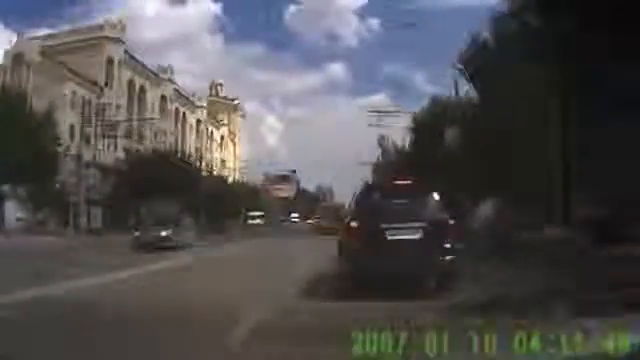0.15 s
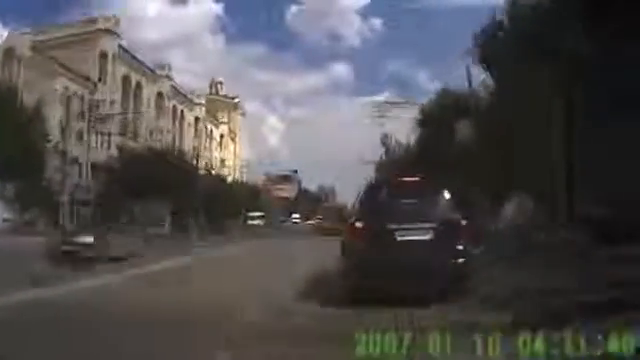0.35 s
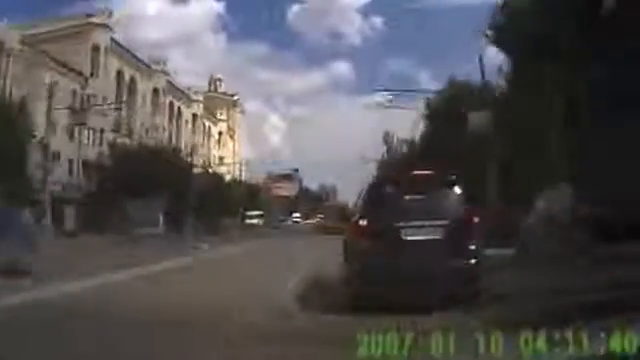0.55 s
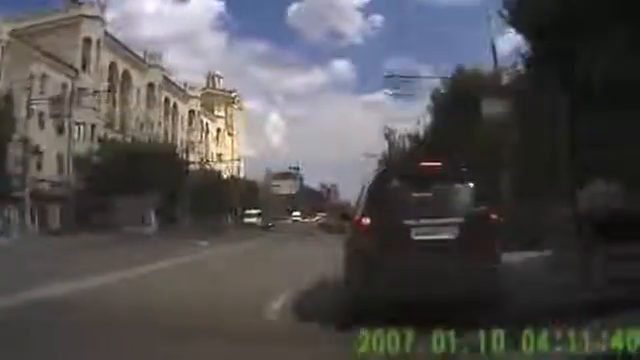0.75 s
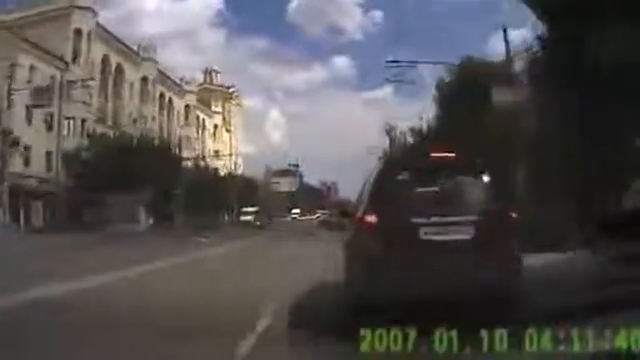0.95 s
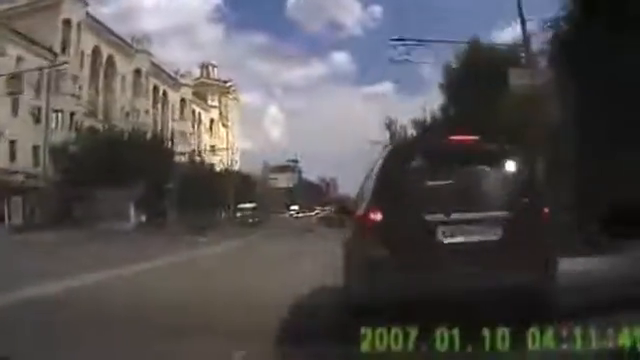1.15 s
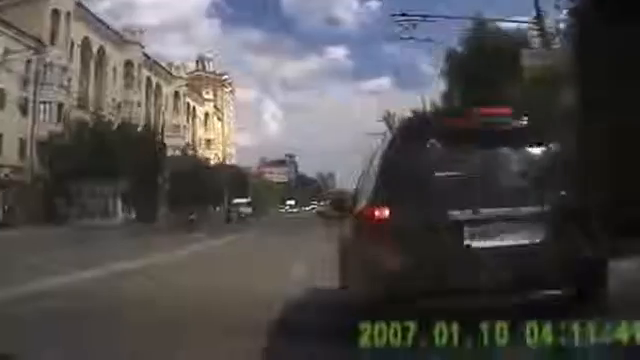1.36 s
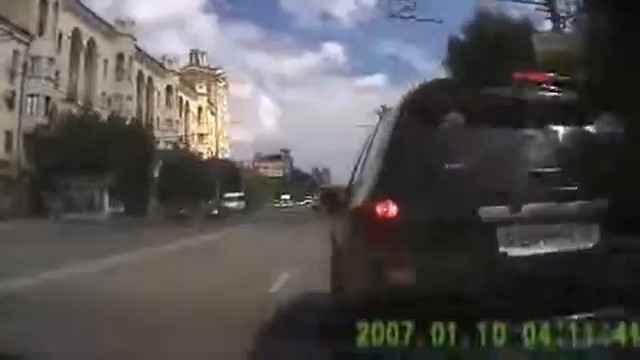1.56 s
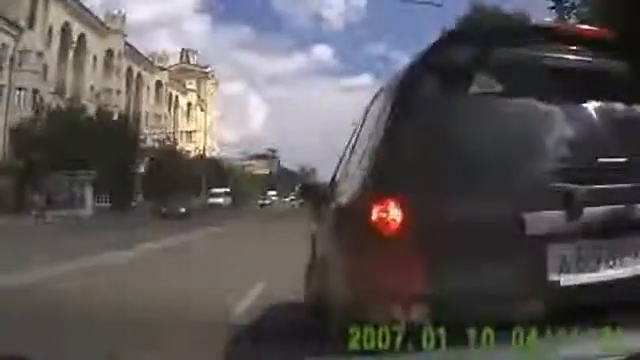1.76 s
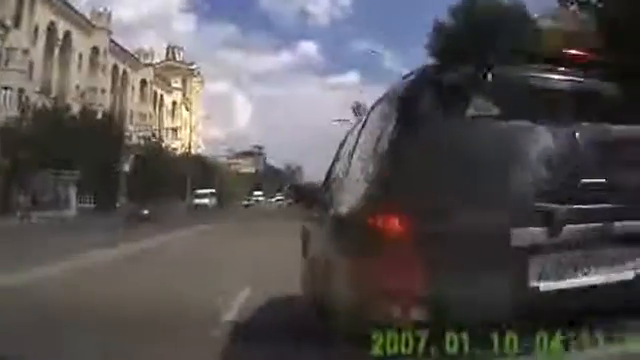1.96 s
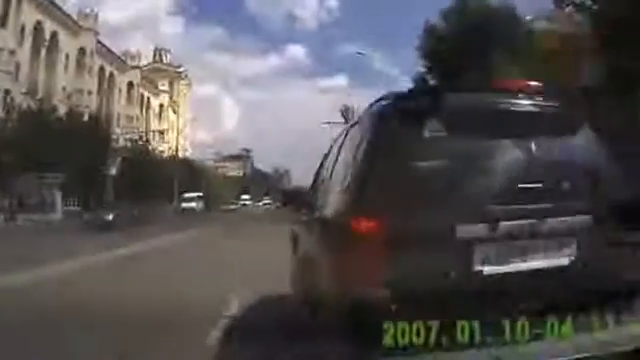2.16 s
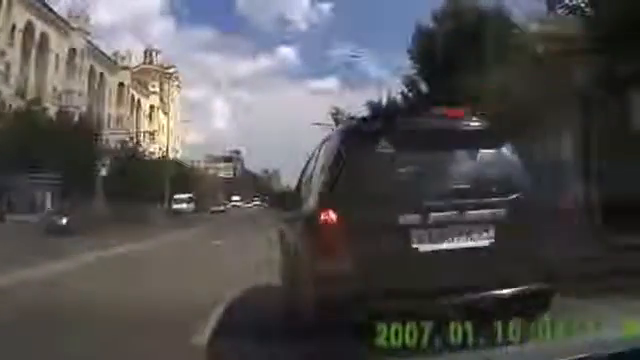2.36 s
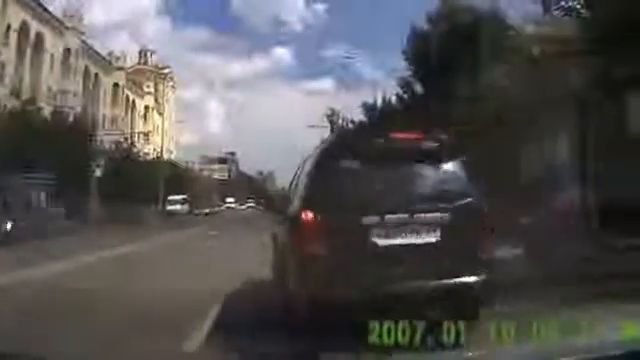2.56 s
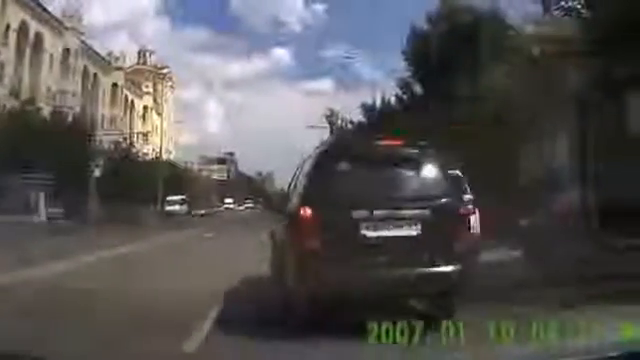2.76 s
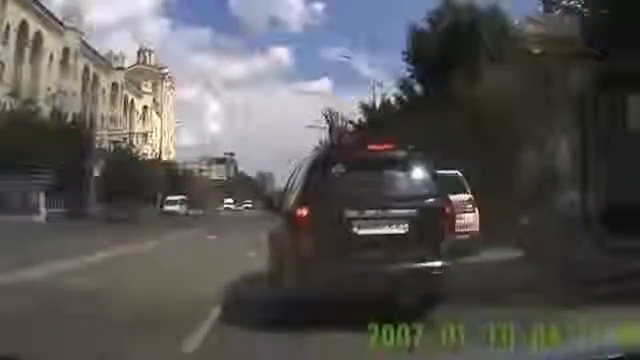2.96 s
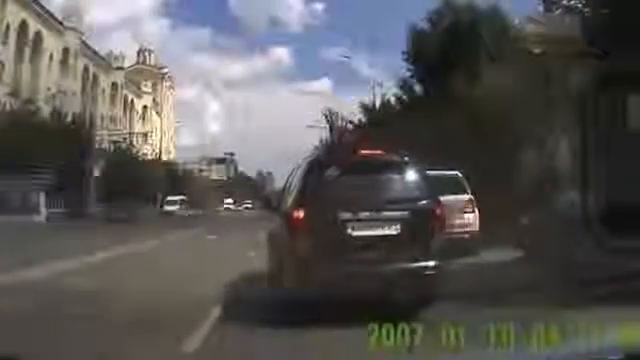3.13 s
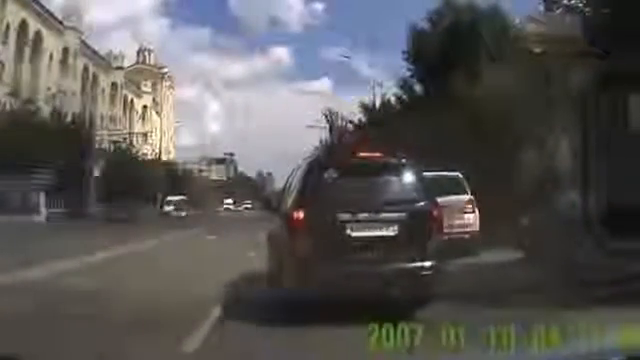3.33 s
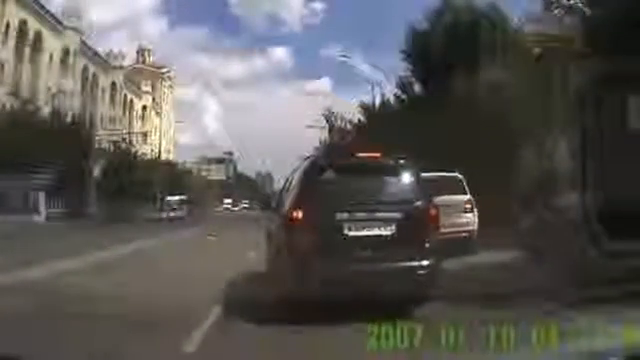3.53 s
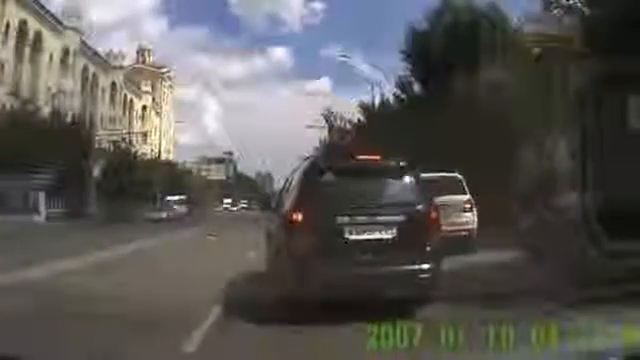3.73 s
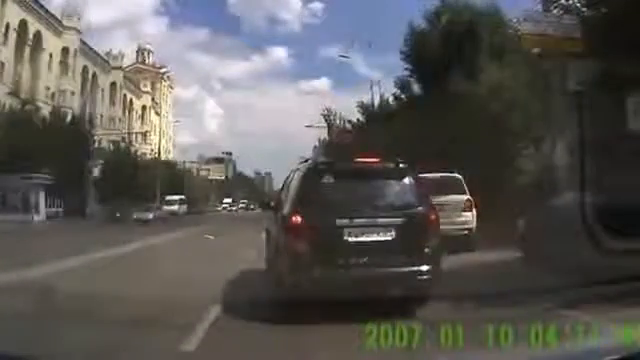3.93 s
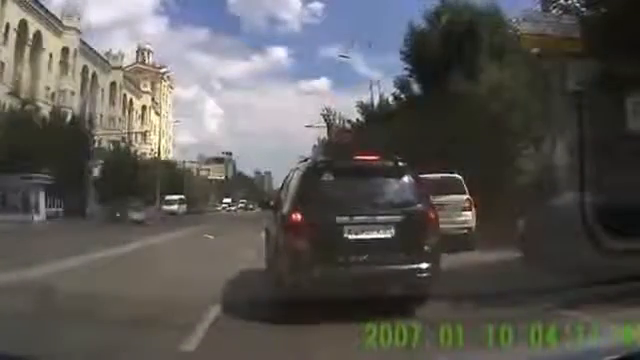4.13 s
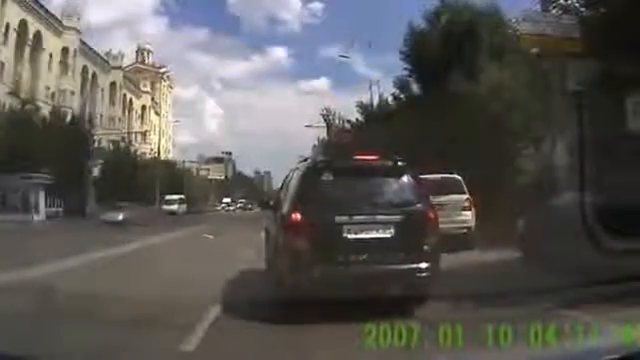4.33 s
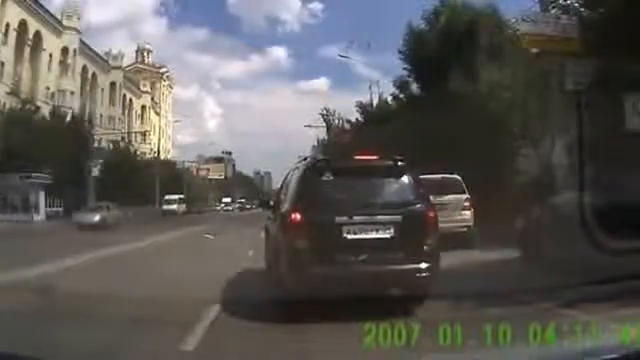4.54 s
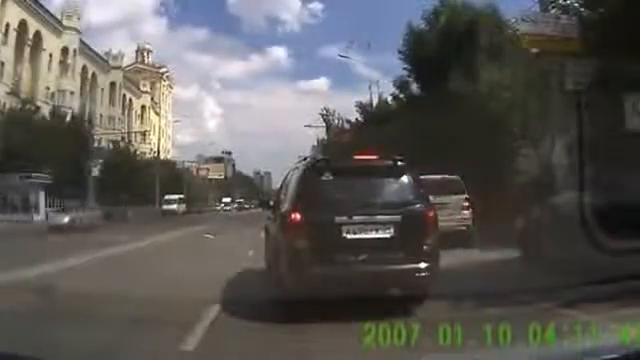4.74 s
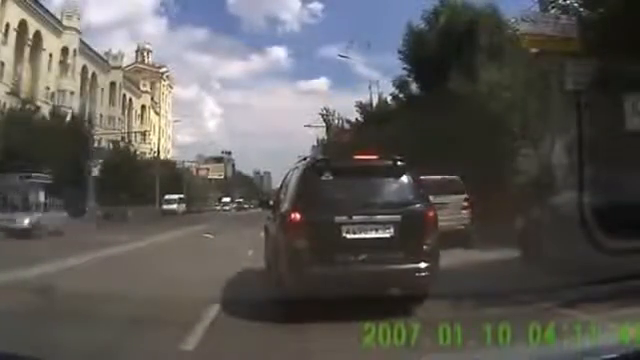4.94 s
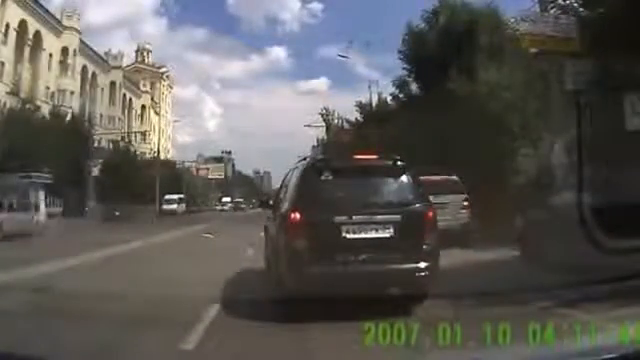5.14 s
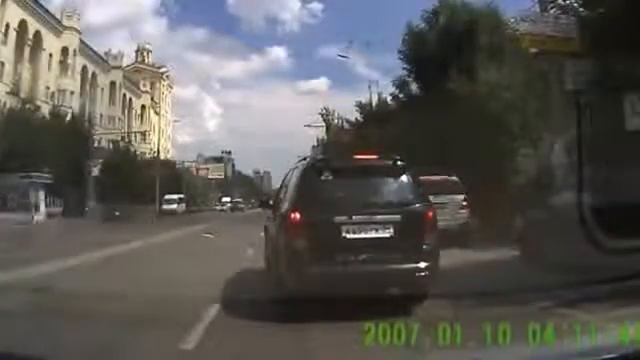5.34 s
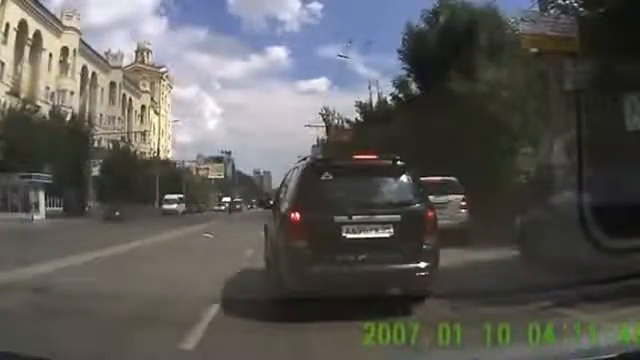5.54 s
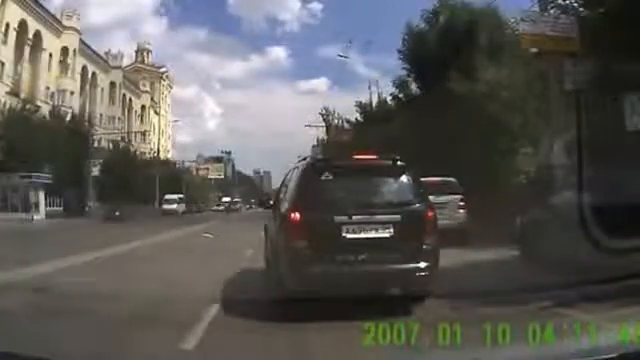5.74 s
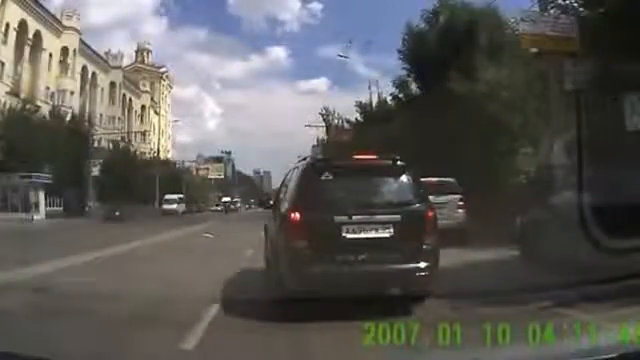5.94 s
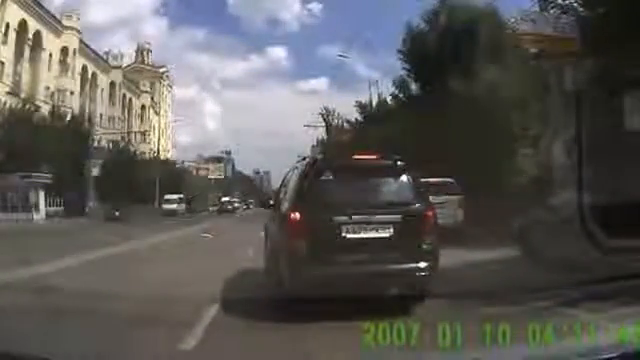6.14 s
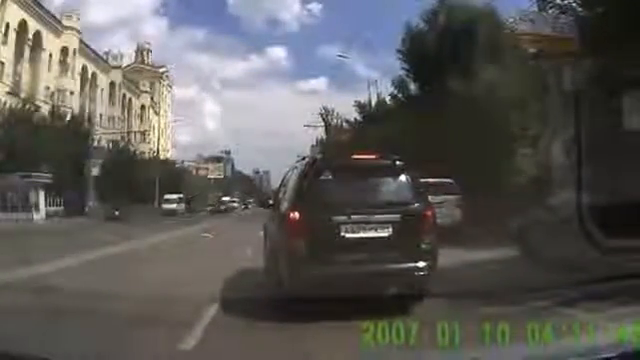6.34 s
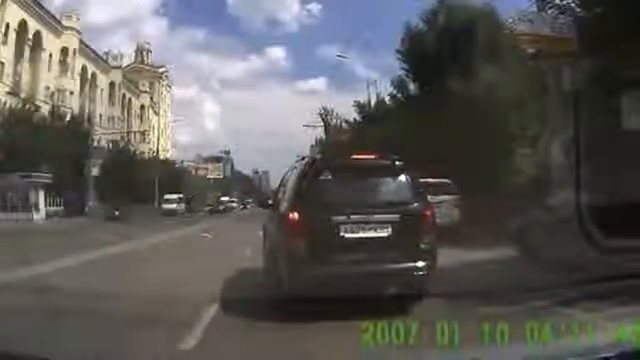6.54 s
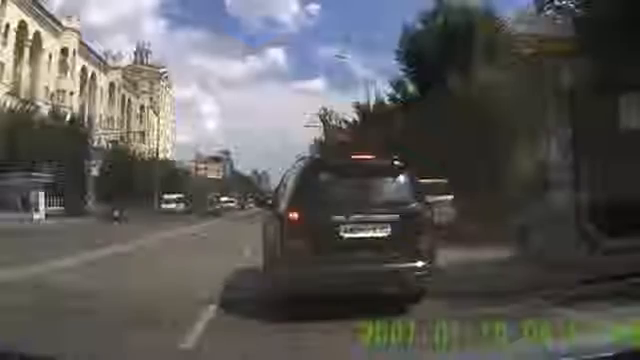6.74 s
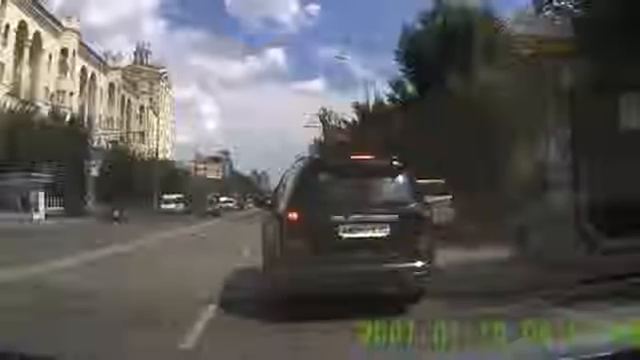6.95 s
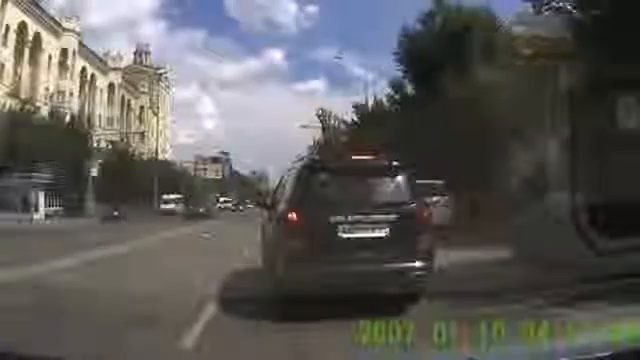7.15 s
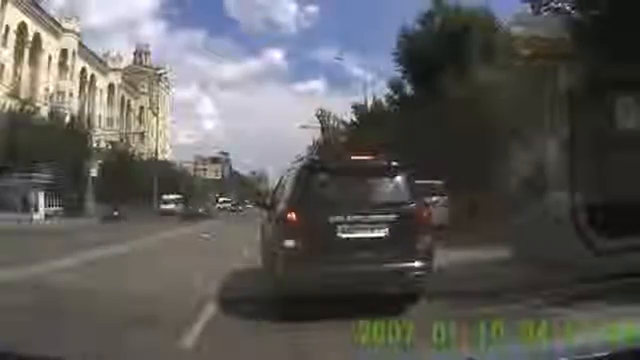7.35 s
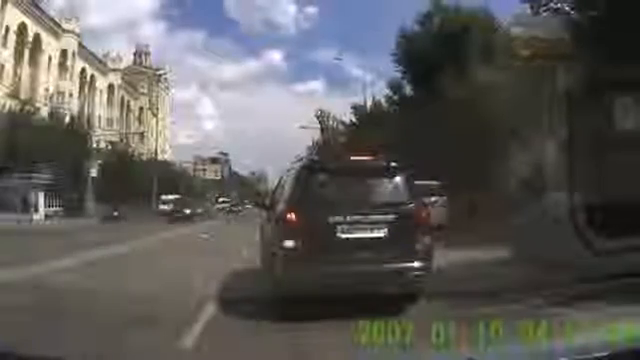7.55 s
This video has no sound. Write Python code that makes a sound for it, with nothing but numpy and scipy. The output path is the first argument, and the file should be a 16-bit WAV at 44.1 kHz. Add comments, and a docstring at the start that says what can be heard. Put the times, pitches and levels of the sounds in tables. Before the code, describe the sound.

A dull dashboard microphone in a small padded cabin picks up rumbling tyres and small plastic ticks in traffic. After a moment the wheels shudder and the tyres squeal; a boomy, crackling collision follows at once, with hard plastic snaps. Things clatter, squeak and slide for about a second. Then only a low hum and soft passing traffic remain, broken by occasional knocks, rustles, a loud click and a final small clatter.

```python
"""A bumper crunches into the car ahead, heard inside a car in city traffic: rushes of fractures ring the body.
Road rumble and passing tyres are filtered noise, the hum a sine; the trim ticks as the car rolls.
Hard braking brings a low judder of the wheels and a squeal of tyres, both wavering oscillators with noise.
Loose things tumble, squeak and rustle as grains of contact exciting resonances; catches snap as decaying modes.
The car then stands humming while a few more knocks and clicks sound near the microphone."""
import sys
import numpy as np
from scipy import signal
from scipy.fft import rfft, irfft, next_fast_len
from scipy.io import wavfile
from scipy.ndimage import uniform_filter1d

SR = 44100
rng = np.random.default_rng(int(sys.argv[2]) if len(sys.argv) > 2 else 0)


def output_pcm(signal):
    """Save a mono or channel-first signal as 16-bit PCM at the path in sys.argv[1].

    Samples are clipped to [-1, 1] before scaling.
    """
    pcm = np.clip(np.atleast_2d(signal).T, -1, 1) * 32767
    wavfile.write(sys.argv[1], SR, np.round(pcm).astype(np.int16))


N = 339129
TIME = np.arange(N) / SR   # s

# Spectrum of the cabin rumble: f/Hz, relative spectral level/dB
RUMBLE_SPECTRUM = [(12, -37.5), (20, -2.5), (60, -3.5), (198, -14), (274, -16), (392, -18), (458, -24.5),
                   (600, -22.5), (780, -63), (1320, -120)]
# Spectrum of the traffic outside: f/Hz, relative spectral level/dB
TRAFFIC_SPECTRUM = [(180, -33.5), (300, 0), (318, -12.5), (424, -7.5), (714, -3.5), (820, -8), (1010, 0),
                    (3100, -28.5), (3860, -25.5), (4750, -35), (6180, -77.5), (10400, -120)]
# Road rumble in the cabin, sinking to an idle as the car stops: t/s, level/dB
ROAD_LEVEL = [(0, -33), (0.9, -30.5), (1.55, -32.5), (2.8, -37), (3.3, -42.5), (4.5, -43.5), (7.66, -44)]
# Other cars passing: t/s when nearest, roar level/dB, hiss level/dB, time to come close/s
CAR_PASSES = [(1.12, -30.5, -43.5, 0.19), (3.66, -36.5, -39.5, 0.48), (6.25, -43, -44, 0.66)]
# Snaps of plastic: t/s, relative level/dB, ring f/Hz
SNAP_EVENTS = [(0.065, -22, 1940), (0.1962, -26.5, 1930), (0.3225, -27, 1700), (0.335, -24.5, 2560),
               (0.3815, -23, 2880), (0.5508, -23.5, 1730), (0.5877, -21, 1740), (0.8384, -23, 2080),
               (0.871, -30, 2700), (1.0664, -20.5, 1860), (1.4775, -35, 3030), (1.6604, -6, 2190),
               (1.7746, -5.5, 2070), (1.9962, -9, 1830), (2.0085, -11, 1850), (2.0181, -3, 1900),
               (2.0266, -5, 1600), (2.058, -7.5, 1480), (2.2099, -9.5, 2550), (2.613, -18.5, 2800),
               (5.2456, -24.5, 3420), (6.2986, 3, 2450), (6.34, -21, 1940), (7.0482, -21, 2060),
               (7.457, -9.5, 2590)]
# Modes of snapping plastic: f/Hz, relative level/dB, t60/s
PLASTIC_MODES = [(170, -2, 0.033), (700, -26, .02), (980, -18.5, 0.013), (1490, -31.5, .015),
                 (2020, -6, 0.0066), (2810, 1.5, 0.006), (3630, -2, .007), (4210, -12.5, 0.035)]
# Jolts that set the wheels hopping (brakes bite, wheels lock, impact, rocking back):
# t/s, hold/s, relative level/dB
WHEEL_JOLTS = [(1.587, 0.011, -21.5), (1.647, 0.18, -16), (1.939, .06, -12), (2.086, .01, -19),
               (2.198, 0.2, -33)]
# Knocks of loose things: t/s, relative level/dB, bass re middle/dB, treble re middle/dB,
# own ring f/Hz, number of rebounds (rounded)
KNOCK_EVENTS = [(1.597, -28.5, -8, -3.5, 1464, 2), (1.66, -20, -8, -6, 1470, 0),
                (1.68, -19.5, -5.5, 3.5, 1860, 1), (2.343, -12.5, -2.5, -5.5, 1410, 0),
                (2.368, -23.5, -3, 2.5, 1440, 1), (2.4, -16, -3, 2.5, 1010, 0),
                (2.409, -16, 0, -9, 1030, 0), (2.433, -25, 1, -3, 553, 0),
                (2.461, -21.5, -5.5, -1, 1026, 0), (2.472, -19, -5, -3.5, 1030, 0),
                (2.757, -16.5, -4.5, 0, 650, 0), (2.86, -32.5, 5, -11, 407, 2),
                (2.895, -19.5, -4.5, -8, 1024, 1), (2.959, -27.5, -3, -5, 1950, 1),
                (4.765, -13, 5, -7.5, 592, 0), (4.7718, -18.5, -3, -6, 563, 0),
                (5.06, -35.5, 9.5, -5, 760, 0), (5.276, -34.5, 1, -3, 530, 0),
                (7.262, -34, -3.5, -13, 1550, 0), (7.386, -34.5, -17, 0, 2510, 0),
                (7.423, -31, -18, -11, 1610, 0), (7.457, -25.5, -8, 2, 1056, 0),
                (7.4817, -16.5, -13, -9, 963, 1), (7.51, -16.5, -9, -12, 1012, 1),
                (7.526, -35.5, 8, -4, 523, 0), (7.55, -23.5, -11, -9, 1002, 0.16)]
# Resonances of the dashboard and its plastic fittings: f/Hz, width/Hz, relative level/dB
DASH_MODES = [(153, 69, -6.5), (387, 157, -3.5), (560, 127, -6), (756, 49, -8.5), (1036, 38, -3.5),
              (1382, 82, -1.5), (1970, 240, -6.5), (2300, 350, -4), (2970, 70, -10), (3200, 45, -7.5),
              (3930, 630, -9.5)]
# Tyres skid, are jolted free by the impact and catch again:
# t/s, hold/s, time until they grip again/s, relative level/dB
TYRE_SKIDS = [(1.665, .1, .29, -13), (1.939, 0.057, 0.59, -22.5), (2.827, 0.022, .52, -29.5)]
# Resonances of the car body: f/Hz, width/Hz, relative level/dB
BODY_MODES = [(90, 26, -1.5), (147.4, 30, 5), (266, 36, -1), (383, 49, 4), (663, 70, -4), (747, 61, -4),
              (906, 210, -10.5), (1120, 66, -10), (1517, 210, -10), (2144, 250, -20.5), (2510, 150, -23),
              (3060, 85, -23), (3730, 790, -28)]
# Plastic rubbing on plastic: t/s, length/s, f/Hz, width/Hz, level/dB
SQUEAK_EVENTS = [(1.983, .022, 1704, 80, -22), (2.243, 0.026, 1864, 60, -29),
                 (2.566, .05, 2860, 198, -41.5), (7.481, 0.056, 3970, 352, -27.5),
                 (7.545, 0.023, 3820, 203, -32)]
# Things sliding and rustling: t/s, length/s, level/dB
RUSTLE_EVENTS = [(2.309, 0.16, -31), (2.598, .10, -35.5), (2.795, 0.3, -39.5), (4.075, 0.018, -40.5),
                 (4.131, .035, -36.5), (4.196, 0.043, -39.5), (4.935, 0.099, -39), (5.241, 0.12, -49),
                 (6.316, 0.1, -42), (7.066, 0.019, -41.5)]

HUM_HZ, HUM_DB = 293.6, -47   # the level is that of the sine's peak
HISS_LAG_S = 0.11   # tyres throw their hiss backwards, so it peaks after the roar
FAR_ROAR_DB, FAR_HISS_DB = -56.5, -52   # distant traffic
OWN_ROAR_DB, OWN_HISS_DB = -12.5, -14   # the car's own tyres, relative to its rumble
JUDDER_HZ = 44.95   # mean rate at which the wheels hop
JOLT_ATTACK_S, JOLT_FALL_DB_PER_S = 0.018, 159.5
KNOCK_T60_S, KNOCK_BASS_T60_S, KNOCK_RING_T60_S = 0.058, 0.08642, 0.07598
REBOUND_S, REBOUND_SHRINK, REBOUND_LOSS_DB = 0.0145, 0.88, 3   # each bounce is shorter and weaker
SKID_ATTACK_S, SKID_FALL_DB_PER_S, GRIP_S = 0.0708, 45, 0.082
SQUEAL_HZ, SQUEAL_SAG_HZ, SAG_LAG_S = 1667, 111.5, 0.0352   # a hard slide drags the pitch down
CRASH_S = 1.885
# Parts of the crash: level/dB, attack/s, hold/s, fall/(dB/s)
BOOM, CRUNCH, SPLINTERS = (-9, 0.04, 0.0178, 114.5), (-7, 0.0219, 0.0236, 158.5), (-15, 0.0416, 0.0528, 151)
SETTLE_DB, SETTLE_FALL_DB_PER_S = -24, 36   # the bent panels creak on, relative to the crash
CABIN_T60_S, CABIN_DB = 0.055, -23.63
MIC_EDGE_HZ, BANDWIDTH_HZ, CUTOFF_HZ = 3410, 4904, 15000


def from_db(db):
    """Logarithmic level: 20 dB is a factor of ten in amplitude."""
    return 10 ** (np.asarray(db) / 20)


def rms_one(x):
    """Normalisation of mean power to 1."""
    return x / np.sqrt(np.mean(x ** 2) + 1e-20)


def steady(x, size):
    """Level equalisation by the running rms over `size` samples."""
    return x / np.sqrt(np.abs(uniform_filter1d(x ** 2, size=size)) + 1e-12)


def cut(x, hz, kind, order=3):
    """Butterworth filtering: maximally flat passband."""
    return signal.sosfilt(signal.butter(order, hz, kind, fs=SR, output="sos"), x + 1e-18)


def drift(rate_hz):
    """Low-passed chance: noise through a double pole, scaled to rms 1."""
    step = 40   # samples between control points
    pole = np.exp(-2 * np.pi * rate_hz * step / SR)
    noise = rng.standard_normal(N // step + 2002)
    slow = signal.lfilter([1], [1, -2 * pole, pole * pole], noise)[2000:]   # drop the filter's start
    return np.interp(np.arange(N) / step, np.arange(len(slow)), rms_one(slow))


def coloured_noise(spectrum):
    """Spectral shaping of white noise, interpolated over log frequency."""
    hz, db = np.transpose(spectrum)
    size = next_fast_len(N)
    bins = np.maximum(np.fft.rfftfreq(size, 1 / SR), 1)
    gain = from_db(np.interp(np.log(bins), np.log(hz), db))
    return rms_one(irfft(rfft(rng.standard_normal(size)) * gain, size)[:N])


def resonate(x, modes):
    """Modal superposition: parallel two-pole resonances with alternating signs."""
    out = 0
    for k, (hz, width, db) in enumerate(modes):
        r = np.exp(-np.pi * width / SR)
        poles = [1, -2 * r * np.cos(2 * np.pi * hz / SR), r * r]
        ring = (1 - r * r) / 2 * signal.lfilter([1, 0, -1], poles, x + 1e-18)
        out = out + (-1) ** k * from_db(db) * ring
    return out


def grains(size, per_s, spread_db):
    """Random impulse process: tiny contacts of uneven strength and either sign."""
    strength = from_db(spread_db * np.minimum(rng.exponential(1, size), 4))
    sign = rng.choice([-1, 1], size)
    return strength * sign * (rng.random(size) < per_s / SR)


def swell(s, attack_s, hold_s, fall_db_per_s):
    """Envelope of linear rise, hold and exponential decay."""
    t = TIME - s
    rise = np.clip(t / attack_s, 0, 1)
    return rise * from_db(-fall_db_per_s * np.maximum(t - attack_s - hold_s, 0))


def add(out, s, sound):
    """Superposition of a sound beginning at time s."""
    start = int(round(s * SR))
    out[start:start + len(sound)] += sound[:N - start]


def road_level():
    """Linear interpolation of the road level (dB) over time."""
    s, db = np.transpose(ROAD_LEVEL)
    return np.interp(TIME, s, db)


def tyre_levels(rumble_db, steepness=2.15):
    """Power addition of distant, own and passing tyres, each pass fading with distance (dB)."""
    roar = from_db(FAR_ROAR_DB) ** 2 + from_db(rumble_db + OWN_ROAR_DB) ** 2
    hiss = from_db(FAR_HISS_DB) ** 2 + from_db(rumble_db + OWN_HISS_DB) ** 2
    for s, roar_db, hiss_db, close_s in CAR_PASSES:
        t = TIME - s
        roar = roar + from_db(roar_db) ** 2 / (1 + (t / close_s) ** 2) ** steepness
        hiss = hiss + from_db(hiss_db) ** 2 / (1 + ((t - HISS_LAG_S) / close_s) ** 2) ** steepness
    return 10 * np.log10(roar), 10 * np.log10(hiss)


def street(flicker_db=1.5, tread_hz=1020, tread_width_hz=260, near_db=-31.0):
    """Broadband rolling noise: rumble through the body, tyres through the glass; a hum is added."""
    rumble_db = road_level()
    roar_db, hiss_db = tyre_levels(rumble_db)
    road = from_db(rumble_db) * steady(coloured_noise(RUMBLE_SPECTRUM), size=9000)

    wash = rms_one(cut(coloured_noise(TRAFFIC_SPECTRUM), 1700, "low", order=4))
    tread_noise = cut(rng.standard_normal(N), [500, 1600], "band")
    tread = rms_one(resonate(tread_noise, [(tread_hz, tread_width_hz, 0)]))
    near = from_db(roar_db - near_db)   # the closer a car passes, the more its tread grooves sing
    roar = (wash + near * tread) / np.sqrt(1 + near ** 2)
    roar = from_db(roar_db + flicker_db * drift(7.6)) * roar

    hiss = rms_one(cut(coloured_noise(TRAFFIC_SPECTRUM), 1494, "high", order=4))
    hiss = from_db(hiss_db + flicker_db * drift(15)) * hiss

    hum_phase = 2 * np.pi * np.cumsum(HUM_HZ + 0.7 * drift(2.96)) / SR
    hum = from_db(HUM_DB + 0.63 * drift(3)) * np.sin(hum_phase)
    return road + roar + hiss + hum


def trim_rattle(per_s=70, below_road_db=-18.5, fall_db_per_s=60):
    """Impulsive excitation: the road shakes ticks out of the trim; they die away after the crash."""
    modes = [(1700, 310, 10.0), (2900, 1800, 0.0), (4220, 250, 5.0)]
    ticks = rms_one(resonate(grains(N, per_s, 2.6), modes))
    rolling = from_db(-fall_db_per_s * np.maximum(TIME - CRASH_S, 0))
    return rolling * from_db(road_level() + below_road_db) * ticks


def snaps(ring_db=4, ring_t60=0.0083, rebound_s=0.000968, rebound=0.75, rebound_growth=0.26,
          stiff_hz=900, tail_db=-23, tail_t60=0.04, gain_db=1.0, size=3000):
    """Free modal decay: a catch lets go and rebounds; plastic rings, then the fittings around it."""
    out, t = np.zeros(N), np.arange(size) / SR
    for s, peak_db, hz in SNAP_EVENTS:
        snap = np.zeros(size)
        for f, db, t60 in list(PLASTIC_MODES) + [(hz, ring_db, ring_t60)]:
            uneven_db = rng.normal(0, 0.84)
            snap += from_db(db + uneven_db - 60 * t / t60) * np.sin(2 * np.pi * f * t)
        flight_s = rebound_s * from_db(rebound_growth * peak_db)   # a harder snap flies longer
        landing = rebound * np.interp(t - flight_s, t, snap, left=0)
        snap = cut(snap + landing, stiff_hz, "high", order=1)
        tail = rms_one(cut(rng.standard_normal(size), [900, 4200], "band", order=2))
        tail = tail * from_db(tail_db - 60 * t / tail_t60)
        add(out, s + 0.0008, from_db(peak_db + gain_db) * (snap / np.abs(snap).max() + tail))
    return out


def judder(wobble=0.05, shake_db=-7, gain_db=-1):
    """Sprung-mass oscillation: the braked wheels hop on their springs and shake the body."""
    jolts = [from_db(db) * swell(s, JOLT_ATTACK_S, hold, JOLT_FALL_DB_PER_S) for s, hold, db in WHEEL_JOLTS]
    level = np.max(jolts, axis=0)
    phase = 2 * np.pi * np.cumsum(JUDDER_HZ * (1 + wobble * drift(2.9))) / SR
    hop = np.sqrt(2) * np.sin(phase)
    shake = steady(cut(rng.standard_normal(N), [30, 120], "band", order=2), size=3000)
    return level * from_db(gain_db) * (hop + from_db(shake_db) * shake)


def bounces():
    """Inelastic rebound: yields t/s, low, middle and high level/dB, and ring f/Hz of each contact."""
    for s, db, bass_db, treble_db, hz, rebounds in KNOCK_EVENTS:
        for k in range(1 + int(round(rebounds))):
            level = db - REBOUND_LOSS_DB * k
            yield s, level + bass_db, level, level + treble_db, hz
            s = s + REBOUND_S * REBOUND_SHRINK ** k


def knocks(direct_db=-18, ring_db=-1, chatter_db=-1, size=8000):
    """Impact excitation: the thing itself rings, and a dying chatter shakes the dashboard."""
    out, t = np.zeros(N), np.arange(size) / SR
    attack = 1 - np.exp(-t / 0.00088)
    for s, low_db, middle_db, high_db, hz in bounces():
        contacts = grains(2 * size, 2500, 2.8)
        chatter = resonate(contacts, DASH_MODES) + from_db(direct_db) * contacts
        bands = [([118, 700], low_db, KNOCK_BASS_T60_S),
                 ([700, 1800], middle_db, KNOCK_T60_S),
                 ([1800, 4800], high_db, KNOCK_T60_S)]
        for band_hz, db, t60 in bands:
            part = steady(cut(chatter, band_hz, "band", order=4), size=700)[size:]
            add(out, s, part * from_db(db + chatter_db - 60 * t / t60) * attack)
        # the ring takes the level of the band it lies in
        own_db = np.interp(hz, [650, 950, 1700, 2200], [low_db, middle_db, middle_db, high_db]) + ring_db
        ring = from_db(own_db - 60 * t / KNOCK_RING_T60_S) * np.sin(2 * np.pi * hz * t)
        add(out, s, ring * attack)
    return cut(out, 96, "high")


def slide():
    """Friction loading: the harder the tyres slide, the lower they sing; gives level and pitch (Hz)."""
    level = np.zeros(N)
    for s, hold, length, db in TYRE_SKIDS:
        sliding = np.clip((s + length - TIME) / GRIP_S, 0, 1)   # falls to zero as the tyres grip
        level += from_db(db) * swell(s, SKID_ATTACK_S, hold, SKID_FALL_DB_PER_S) * sliding
    lag = np.exp(-1 / (SAG_LAG_S * SR))
    load = signal.lfilter([1 - lag], [1, -lag], level / level.max() + 1e-18)
    return level, SQUEAL_HZ - SQUEAL_SAG_HZ * load


def skid(octave_db=-13, octave_rough=0.6, scrub_db=-8.0, gain_db=-2.0):
    """Stick-slip oscillation: tyres at nearly one unsteady pitch beat; rubber scrubs underneath."""
    level, pitch = slide()
    tone = 0
    for detune, tyre_db in ((0, 2.5), (0.05, -6.5), (-0.035, -3.5)):
        unsteady = 0.014 * drift(25) + 0.024 * drift(300)
        phase = 2 * np.pi * np.cumsum(pitch * (1 + detune + unsteady)) / SR
        octave = np.sin(2 * phase + octave_rough * drift(250))
        octave = from_db(octave_db + 1.8 * drift(200)) * octave
        tone = tone + from_db(tyre_db + 3.2 * drift(60)) * (np.sin(phase) + octave)
    rubber_modes = [(1330, 260, 2.0), (2070, 280, -1), (3540, 890, -7.5)]
    scrub = rms_one(resonate(grains(N, 4000, 8.7), rubber_modes))
    return level * from_db(gain_db) * (steady(tone, size=1500) + from_db(scrub_db) * scrub)


def crumple(db, attack_s, hold_s, fall_db_per_s):
    """Two-stage decay: swells with the blow, dies fast, then lingers as the panels settle."""
    blow = swell(CRASH_S, attack_s, hold_s, fall_db_per_s)
    settling = from_db(SETTLE_DB) * swell(CRASH_S, attack_s, hold_s, SETTLE_FALL_DB_PER_S)
    return from_db(db) * np.maximum(blow, settling)


def crunch(per_s=1800, spread_db=3.5, lumps_db=2.5):
    """Fracture noise: buckling panels break in an uneven rush that rings the car body."""
    body = resonate(grains(N, per_s, spread_db), BODY_MODES)
    boom = crumple(*BOOM) * steady(cut(body, [65, 280], "band"), size=1100)
    middle = crumple(*CRUNCH) * steady(cut(body, [280, 1400], "band"), size=800)
    splinters = crumple(*SPLINTERS) * steady(cut(body, 1900, "high"), size=800)
    return boom + middle + from_db(lumps_db * drift(90)) * splinters


def squeaks():
    """Stick-slip friction: quick catches feed one narrow resonance."""
    out = np.zeros(N)
    for s, length, hz, width, db in SQUEAK_EVENTS:
        size = int(length * SR)
        ring = resonate(grains(3 * size, 2500, 4.9), [(hz, width, 0)])[-size:]   # already ringing
        add(out, s, from_db(db) * rms_one(ring * signal.windows.tukey(size, 0.5)))
    return out


def rustles(per_s=900, spread_db=3.0):
    """Sliding friction: light things catch on plastic in a swell of tiny contacts."""
    out = np.zeros(N)
    modes = [(600, 500, 4.4), (1430, 620, 5.6), (2440, 760, 1.5), (4180, 480, 0.5)]
    for s, length, db in RUSTLE_EVENTS:
        size = int(length * SR)
        rub = resonate(grains(size, per_s, spread_db), modes)
        add(out, s, from_db(db) * rms_one(rub * signal.windows.tukey(size, 0.5)))
    return out


def cabin(x, size=9000):
    """Diffuse reverberation: the small padded cabin answers with a short, dull tail."""
    t = np.arange(size) / SR
    tail = cut(rng.standard_normal(size), 1800, "low", order=1)
    tail = tail * from_db(-60 * t / CABIN_T60_S) * (t > 0.003)
    tail = tail / np.sqrt(np.sum(tail ** 2))   # unit energy
    return x + from_db(CABIN_DB) * signal.fftconvolve(x, tail)[:N]


def scene():
    """Superposition of street, skid and crash with the small things inside the cabin."""
    inside = cabin(trim_rattle() + snaps() + knocks() + squeaks() + rustles())
    return (street() + judder() + skid() + crunch() + inside)[None]


def record(dry, knee=0.67):
    """Band limitation and saturation: a narrow-band microphone chain overloads on the hardest peaks."""
    narrow = cut(dry, MIC_EDGE_HZ, "low", order=6)
    narrow = signal.sosfilt(signal.ellip(8, 0.5, 70, BANDWIDTH_HZ, fs=SR, output="sos"), narrow)
    size = np.abs(narrow)
    over = np.maximum(size - knee, 0)
    bent = (1 - knee) * np.tanh(over / (1 - knee))   # soft approach to full scale
    clipped = np.sign(narrow) * (size - over + bent)
    return cut(clipped, CUTOFF_HZ, "low", order=16)


dry = scene()
out = record(dry)
output_pcm(out)
```